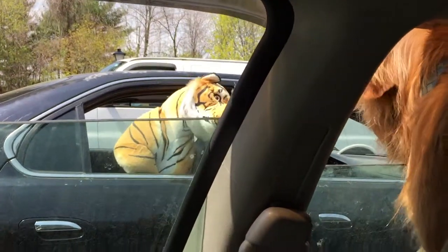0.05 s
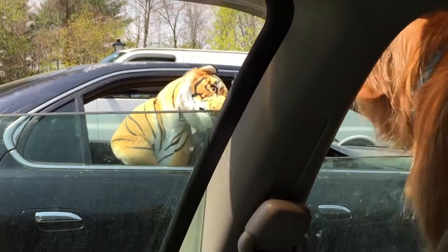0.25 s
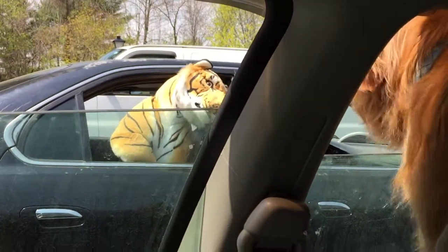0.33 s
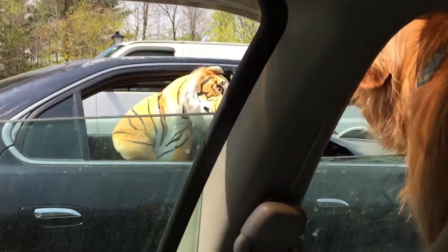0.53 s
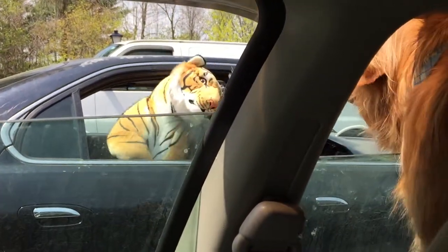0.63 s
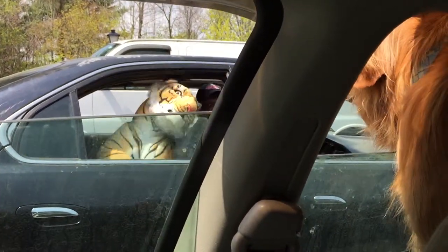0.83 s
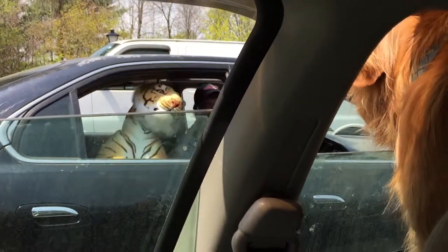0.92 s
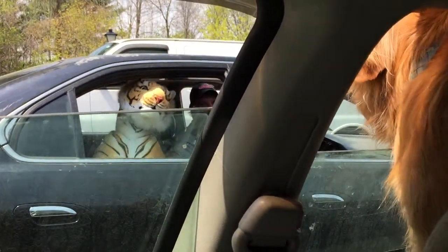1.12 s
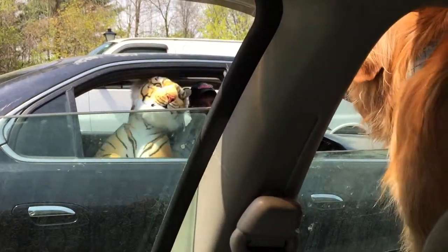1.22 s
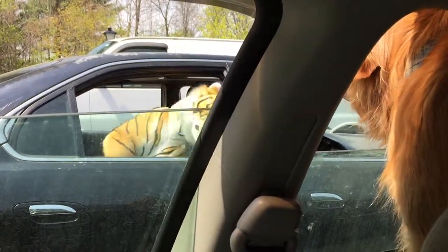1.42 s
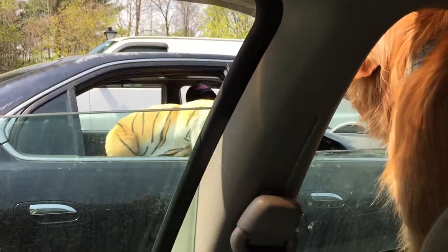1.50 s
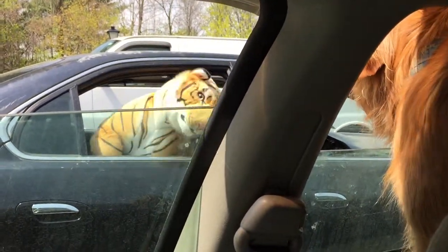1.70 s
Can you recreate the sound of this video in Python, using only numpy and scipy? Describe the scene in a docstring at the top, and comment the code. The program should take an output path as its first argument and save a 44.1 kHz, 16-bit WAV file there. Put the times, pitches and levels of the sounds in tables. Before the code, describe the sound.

A dog close to the microphone growls low, gives one muffled bark, snaps its jaws and growls again. It is inside a standing car, with the idling engine rumbling and faint collar clinks.

```python
"""Inside a standing car, a dog growls low, breaks into one muffled bark, snaps its jaws and growls again.
Its slack vocal folds flap unevenly for the growls; the bark is one arch of pitch through throat and mouth.
The idling engine rumbles under a thin whine, with faint collar tinks, clicks, rustles and squeaks.
An automatic gain control ducks the mix on the bark and lets the background swell back."""
import sys
import numpy as np
from scipy import signal
from scipy.fft import rfft, irfft
from scipy.io import wavfile
from scipy.ndimage import uniform_filter1d

SR = 44100
rng = np.random.default_rng(int(sys.argv[2]) if len(sys.argv) > 2 else 0)


def put_to_file(sound):
    """Save the sound as 16-bit audio at rate SR, in the file named by the first command-line argument."""
    columns = np.atleast_2d(sound).T  # one column per channel
    safe = np.clip(columns, -1, 1)
    whole_steps = np.round(safe * 32767)
    wavfile.write(sys.argv[1], SR, whole_steps.astype(np.int16))


N = 77175
T = np.arange(N) / SR


def amp(db):
    """Decibels to gain."""
    return 10 ** (np.asarray(db) / 20)


def unit(x):
    """Scales to rms 1."""
    return x / np.sqrt(np.mean(x ** 2) + 1e-20)


def curve(points):
    """Automation lane: straight lines through (time, value) rows."""
    return np.interp(T, *np.transpose(points))


def sine(hz):
    """Oscillator that follows a pitch curve."""
    return np.sin(2 * np.pi * np.cumsum(hz) / SR)


def drift(hz):
    """Random modulation of rms 1, rolled off above hz."""
    rolloff = 1 + (np.fft.rfftfreq(N, 1 / SR) / hz) ** 4
    return unit(irfft(rfft(rng.standard_normal(N)) / rolloff, N))


def colour(x, points, size=8192):
    """Minimum-phase EQ through (frequency, gain) rows, scaled to keep white noise at its level."""
    hz, db = np.transpose(points)
    bins_hz = abs(np.fft.fftfreq(size, 1 / SR)) + 1
    log_gain = np.log(amp(np.interp(np.log(bins_hz), np.log(hz), db)))
    impulse = np.fft.ifft(np.exp(np.conj(signal.hilbert(log_gain)))).real[:size // 2]
    return signal.fftconvolve(x, impulse / np.linalg.norm(impulse))[:N]


def resonate(x, hz, width):
    """A steep resonance of gain 1."""
    band = [max(hz - width / 2, 10), hz + width / 2]
    return signal.sosfilt(signal.butter(2, band, "bandpass", fs=SR, output="sos"), x)


def formants(drive, swell, rings):
    """Rings a bank of resonances with a swelling drive; the swell sets the level."""
    bank = sum(amp(db) * unit(resonate(drive * swell, hz, width)) for hz, width, db in rings)
    return bank * np.std(swell)


# EQ of the idle rumble in the cabin: (frequency [Hz], gain [dB])
RUMBLE_EQ = [(20, -21.5), (40, 2.5), (90, -1.5), (160, -6), (300, -13), (600, -17.5), (1100, -21.5),
             (1600, -25), (2600, -28.5), (3600, -36.5), (5000, -43), (6500, -42.5), (8000, -49.5),
             (15000, -57.5)]
# fader ride of the whine: (time [s], level [dB])
WHINE_RIDE = [(0, -45.5), (.2, -45.5), (.55, -49), (.65, -40.5), (.8, -39.5), (1, -44.5), (1.75, -43.5)]
# airy hiss around and above the whine: (frequency [Hz], width [Hz], level [dB])
WHINE_AIR = [(2050.4, 135, -48), (4300, 200, -65.5)]
def idling_car(firing_hz=41, firing_db=-54.5, rumble_db=-39.5, whine_hz=2070.2):
    """The bed: idle rumble, the engine's low firing tone and a thin wavering whine."""
    rumble = colour(rng.standard_normal(N), RUMBLE_EQ) * amp(rumble_db + 1.3 * drift(hz=18))
    firing = amp(firing_db) * sine(firing_hz * (1 + .049 * drift(hz=5)))
    whine = sine(whine_hz * (1 + .00299 * drift(hz=32.4)))
    whine *= amp(curve(WHINE_RIDE)) * (1 + .086 * drift(hz=35))
    air = sum(amp(db) * unit(resonate(rng.standard_normal(N), hz, width)) for hz, width, db in WHINE_AIR)
    return rumble + np.sqrt(2) * (firing + whine) + air


# hits on the collar tag: (time [s], level [dB])
TAG_HITS = [(.0278, -53.5), (0.2097, -49), (0.545, -63), (.6963, -56), (.816, -55.5), (1.2365, -63)]
# modes of the tag: (frequency [Hz], gain [dB], time to fall 60 dB [s])
TAG_MODES = [(5700, -3, 0.026), (6400, -18.5, 0.049), (9590, 1.5, .035), (9400, -16.5, 0.016),
             (12190, -13.5, .12), (13900, -6, .012)]
def collar_tag():
    """The small metal tag rings briefly each time it is jogged."""
    tinks = np.zeros(N)
    for start, db in TAG_HITS:
        age = np.maximum(T - start, 0)
        for hz, mode_db, t60 in TAG_MODES:
            tinks += amp(db + mode_db - 60 * age / t60) * np.sin(2 * np.pi * hz * age)
    return tinks


# growl cues: (start [s], end [s], midway level [dB], swell over the length [dB], pulse rate [Hz],
# mouth brightness [dB], chest tone against the voice [dB])
GROWL_CUES = [(0.035, 0.23, -27, 2, 128, 3.5, -12.5), (0.789, 1.053, -49.5, -32, 125, -11, -5.5),
              (1.077, 1.8, -31.5, -1.5, 127, 0.5, -7)]
# dark EQ of the nearly closed mouth: (frequency [Hz], gain [dB])
GROWL_EQ = [(40, -34.5), (90, -17), (128, -0.5), (165, -7.5), (198, 6), (228, -3.5), (280, 2), (365, 3),
            (415, -3.5), (450, -2.5), (510, -12), (600, -9), (680, -4.5), (745, -12.5), (820, -30.5),
            (1200, -26.5), (1600, -50), (3000, -52), (8000, -78)]
def growl(start, end, db, swell_db, rate, bright_db, chest_db):
    """Slack folds flap at uneven intervals into a nearly closed mouth, over a wavering chest tone."""
    jitter, spread_db, attack_s, release_s = .2, 2, .062, .022
    gaps, sizes = rng.standard_normal((200, 2)).T
    flap_times = start + np.cumsum(np.exp(jitter * gaps)) / rate - 1 / rate
    stop = min(end, T[-1])
    heard = (flap_times > 0) & (flap_times < stop)
    pulses = np.zeros(N)
    pulses[(flap_times[heard] * SR).astype(int)] = -amp(spread_db * sizes[heard])
    pulses /= np.sqrt(np.sum(pulses ** 2) / ((stop - start) * SR))  # rms 1 over the growl
    breath = .71 * rng.standard_normal(N)
    voice = colour(pulses + breath, GROWL_EQ)
    voice += (amp(bright_db) - 1) * resonate(voice, hz=787, width=700)
    chest = amp(chest_db) * unit(sine(rate * (1 + .04 * drift(hz=24.7))))
    fades = np.sqrt(np.clip((T - start) / attack_s, 0, 1)) * np.clip((end - T) / release_s, 0, 1)
    progress = np.clip((T - start) / (end - start), 0, 1)
    return (voice + chest) * fades * amp(db + swell_db * (progress - .5))


def cabin_echo(x, t60=.09, wet_db=-13, taps_per_s=3000):
    """Adds the short dense reflections of windows and seats."""
    t = np.arange(SR // 4) / SR
    taps = rng.standard_normal(len(t)) * (rng.random(len(t)) < taps_per_s / SR)
    taps *= (t > .002) * amp(-60 * t / t60)
    return x + amp(wet_db) * signal.fftconvolve(x, unit(taps) / np.sqrt(len(t)))[:N]


# pitch arch of the bark: (time [s], pitch [Hz])
PITCH_ARCH = [(.2, 299.1), (.226, 338.4), (.25, 387.5), (.275, 446), (.298, 470.8), (.32, 477), (.345, 391),
              (.378, 318.7), (.403, 295.8), (.425, 233)]
# push behind the bark: (time [s], level [dB])
EFFORT_RIDE = [(.19, -35), (.207, -23.5), (.232, -12), (.27, -3), (.3, -7), (.33, -13), (.365, -15.5),
               (.406, -20.5), (.424, -34.5), (.44, -48.5)]
# grit in the voice: (time [s], roughness [0-1])
GRIT_RIDE = [(.2, .35), (.265, .45), (.305, .22), (.35, .3), (.42, .45)]
# throat resonances: (frequency [Hz], width [Hz], gain [dB])
THROAT_FORMANTS = [(374, 190, -6), (671.6, 75, 1.5), (1770, 380, -27.5), (2254, 220, -39)]
# mouth opening, which lets out the upper resonances: (time [s], relative level [dB])
MOUTH_RIDE = [(.21, -36), (.228, -8), (.26, 7.5), (.3, 2), (.33, -2), (.352, -16.5), (.372, -22.5),
              (.425, -41)]
# resonances of the open mouth: (frequency [Hz], width [Hz], gain [dB])
MOUTH_FORMANTS = [(738.8, 41, 4), (922, 59, -3.5), (1083.6, 75, 0), (1200, 40, -5), (1326, 41, -19.5)]
# the bark's thin ringing top end: (time [s], level [dB])
TREBLE_RIDE = [(.215, -74), (.245, -47.5), (.28, -41.5), (.32, -38), (.35, -48.5), (.368, -66), (.395, -53),
               (.425, -60)]
# resonances of that top end: (frequency [Hz], width [Hz], gain [dB])
TREBLE_FORMANTS = [(2775, 82, -2), (5020, 67, -4), (5770, 640, 1.5), (10700, 8700, -8.5)]
# EQ of the rasping air: (frequency [Hz], gain [dB])
RASP_EQ = [(60, 9), (200, 16.5), (700, -11.5), (1500, 9), (2300, 7), (3500, -29), (6500, -21),
           (9500, -14.5), (15000, -43.5)]
def bark(jitter=.033, edge_s=.008, throat_db=-.5, mouth_db=-18, rasp_db=-22):
    """A clean fundamental, uneven fold pulses through throat and mouth, and rasp at peak effort."""
    effort, grit = curve(EFFORT_RIDE), np.clip(curve(GRIT_RIDE), 0, 1)
    peak = effort.max()
    gate = np.clip(np.minimum(T - EFFORT_RIDE[0][0], EFFORT_RIDE[-1][0] - T) / edge_s, 0, 1)
    pitch = curve(PITCH_ARCH) * (1 + jitter * grit * drift(hz=173))
    phase = 2 * np.pi * np.cumsum(pitch) / SR
    chest = np.sin(phase) * (1 + grit * drift(hz=111)) * amp(effort) * np.sqrt(2)
    folds = unit(sum(np.cos(k * phase) / k ** .35 for k in range(1, 20)))
    folds *= 1 + .84 * np.cos(phase / 2) + grit * drift(hz=215)  # alternate pulses swing: a sub-octave
    puffs = (1 + 1.37 * np.cos(phase)) * rng.standard_normal(N)
    drive = gate * ((1 - grit) * folds + 2.8 * grit * puffs)
    # throat and rasp grow faster with effort than the chest tone does
    throat = formants(drive, gate * amp(peak + throat_db + 1.33 * (effort - peak)), THROAT_FORMANTS)
    rasp = colour(puffs, RASP_EQ) * amp(rasp_db + 2.2 * (effort - peak))
    mouth = formants(drive, gate * amp(mouth_db + curve(MOUTH_RIDE)), MOUTH_FORMANTS)
    treble = formants(drive, gate * amp(curve(TREBLE_RIDE)), TREBLE_FORMANTS)
    return gate * chest + cabin_echo(throat + mouth + treble + gate * rasp)


# rustle cues: (middle [s], half length [s], level [dB])
RUSTLE_CUES = [(0.503, 0.12, -41), (0.802, 0.094, -46), (1.608, 0.014, -46.5)]
# soft midrange EQ of the rustles: (frequency [Hz], gain [dB])
RUSTLE_EQ = [(200, -15.5), (600, 6.5), (900, 5.5), (1200, 0.5), (1600, -1), (2000, -7.5), (2900, -9),
             (4500, -15.5), (6500, -24.5), (14000, -32)]
def rustles():
    """Faint airy swells as the dog shifts."""
    envelope = sum(amp(db) * np.exp(-((T - middle) / half) ** 2) for middle, half, db in RUSTLE_CUES)
    return envelope * colour(rng.standard_normal(N), RUSTLE_EQ)


# hits of jaws and collar: (time [s], level [dB], decay time [s])
CLICK_HITS = [(.428, -44.5, 0.014), (0.4862, -25, 0.0027), (0.546, -49.5, 0.0029), (1.235, -46.5, 0.0014),
              (1.243, -49, 0.0011)]
# bright EQ of the clicks: (frequency [Hz], gain [dB])
CLICK_EQ = [(300, -4), (1500, -13), (2700, -4), (3600, 5.5), (4600, 2), (5400, 3), (6500, 2), (7800, -6.5),
            (9500, -3.5), (11500, -18), (15000, -19.5)]
# ring of the clicks: (frequency [Hz], width [Hz], gain [dB])
CLICK_MODES = [(3100, 200, -11), (4570, 200, 6)]
def clicks(attack_s=.0016, tail_db=-13, tail_s=.019):
    """Jaws and collar snap in short bright bursts, each with a faint tail in the cabin."""
    envelope = np.zeros(N)
    for start, db, decay in CLICK_HITS:
        age = np.maximum(T - start, 0)
        transient = np.exp(-np.maximum(age - attack_s, 0) / decay)
        tail = amp(tail_db) * np.exp(-age / tail_s)
        envelope += amp(db) * np.minimum(age / attack_s, 1) * (transient + tail)
    snaps = colour(envelope * rng.standard_normal(N), CLICK_EQ)
    return snaps + sum(amp(db) * resonate(snaps, hz, width) for hz, width, db in CLICK_MODES)


# squeak cues: (middle [s], half length [s], pitch [Hz], level [dB])
SQUEAK_CUES = [(.59, 0.015, 3350, -51.5), (1.153, 0.05, 3210, -55)]
def squeaks():
    """Brief thin whistles, barely above the rumble."""
    waver = 1 + .0072 * drift(hz=60)
    return sum(amp(db) * np.exp(-((T - middle) / half) ** 2) * sine(hz * waver)
               for middle, half, hz, db in SQUEAK_CUES)


def scene():
    """The mono mix: the dog close by, over the bed of the car."""
    growls = cabin_echo(sum(growl(*cue) for cue in GROWL_CUES))
    return (idling_car() + collar_tag() + growls + bark() + rustles() + clicks() + squeaks())[None]


def record(dry, threshold_db=-15, slope=.53, release_db_per_s=26, ceiling=.75, cutoff_hz=15700):
    """Gain control with a fast attack and slow release, then a soft clip and a low-pass."""
    power_db = 10 * np.log10(abs(uniform_filter1d(dry[0] ** 2, size=500)) + 1e-12)
    release = T * release_db_per_s
    held_db = np.maximum.accumulate(power_db + release) - release
    over_db = np.maximum(held_db - threshold_db, 0)
    ducked = dry / amp(slope * uniform_filter1d(over_db, size=300))
    clipped = ducked / (1 + (ducked / ceiling) ** 8) ** (1 / 8)
    lowpass = signal.firwin(511, cutoff_hz, window=("kaiser", 9), fs=SR)
    return signal.oaconvolve(clipped, lowpass[None], "same")


dry = scene()
out = record(dry)
put_to_file(out)
```